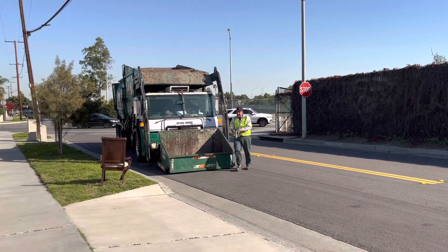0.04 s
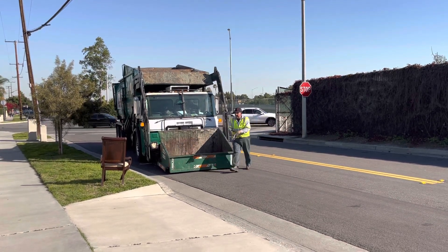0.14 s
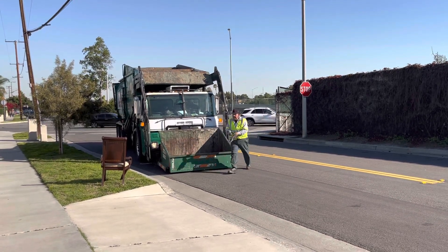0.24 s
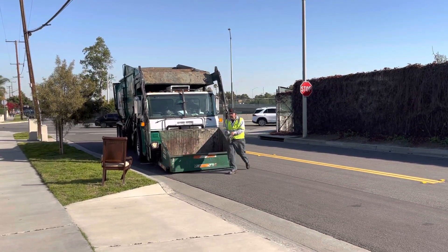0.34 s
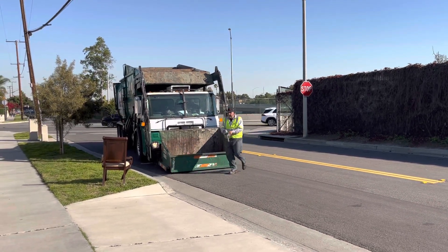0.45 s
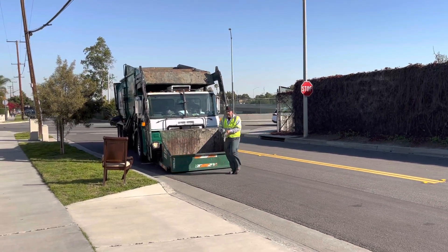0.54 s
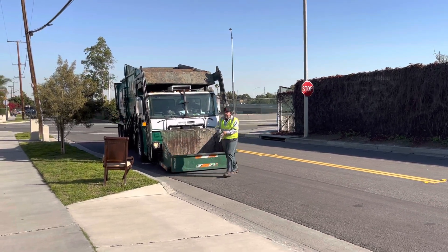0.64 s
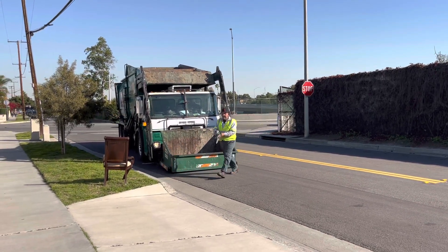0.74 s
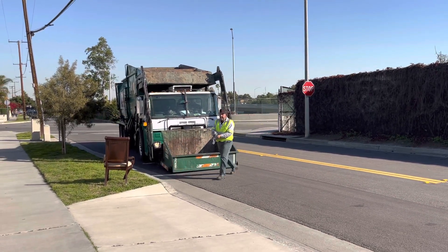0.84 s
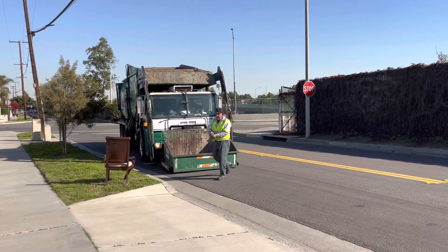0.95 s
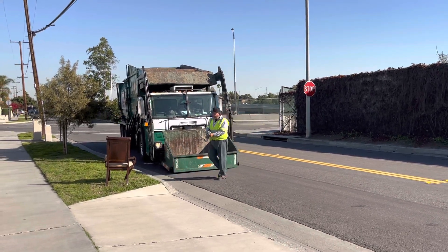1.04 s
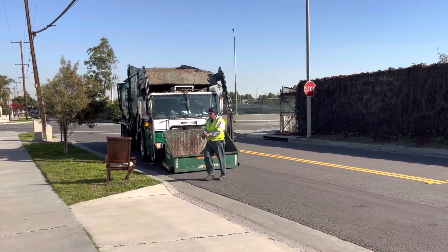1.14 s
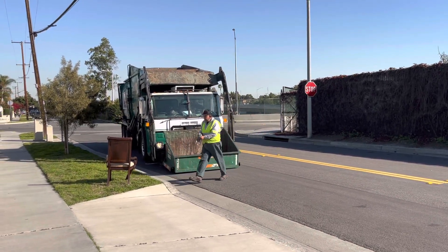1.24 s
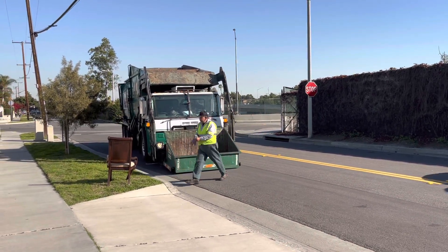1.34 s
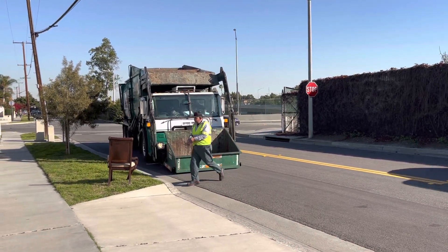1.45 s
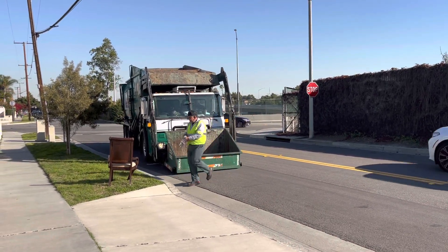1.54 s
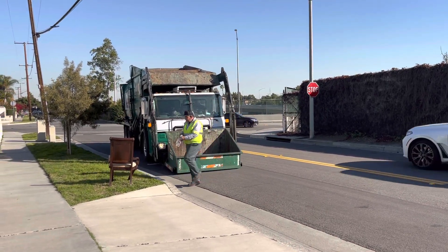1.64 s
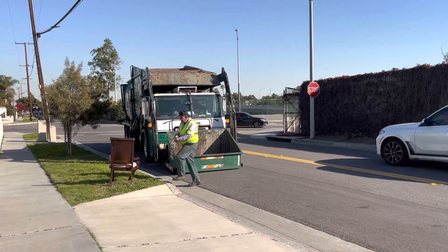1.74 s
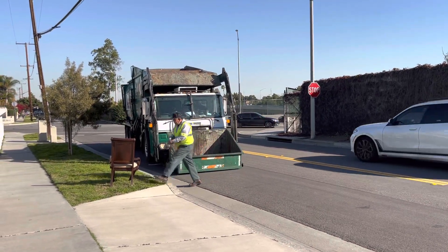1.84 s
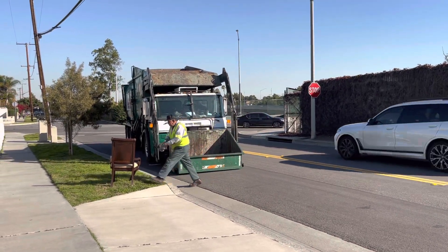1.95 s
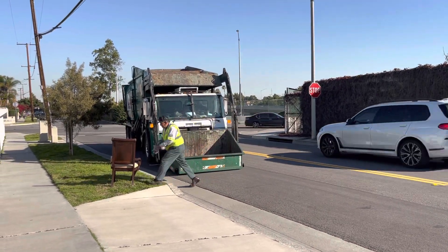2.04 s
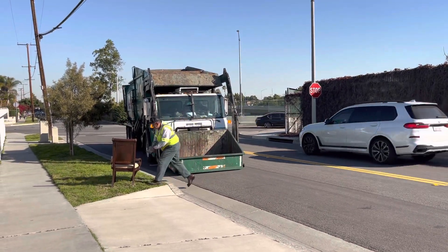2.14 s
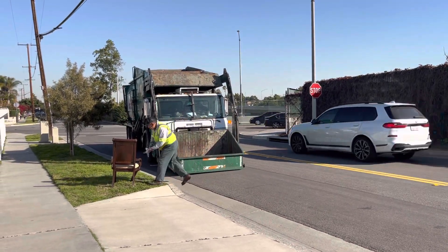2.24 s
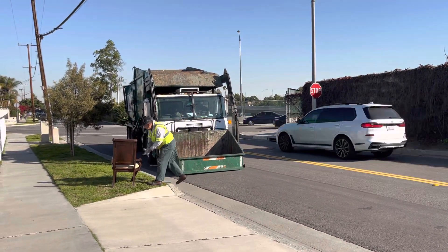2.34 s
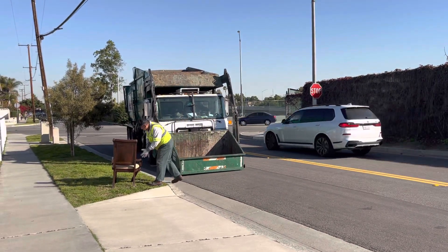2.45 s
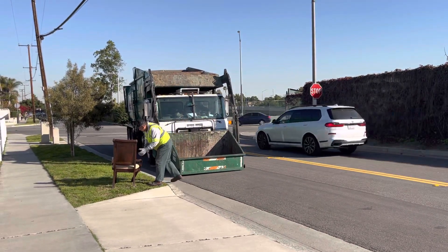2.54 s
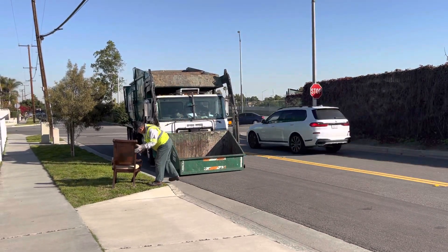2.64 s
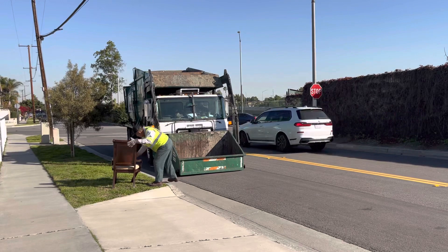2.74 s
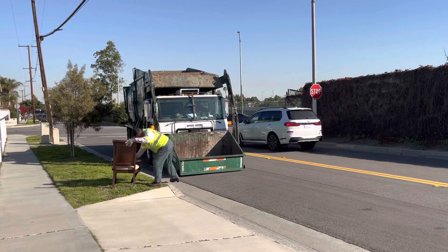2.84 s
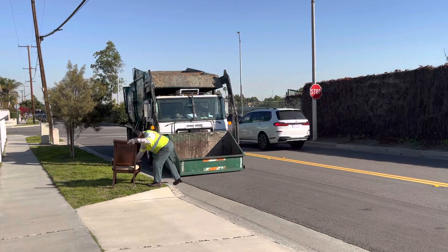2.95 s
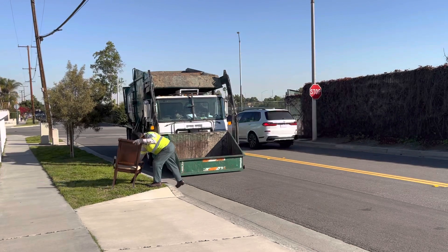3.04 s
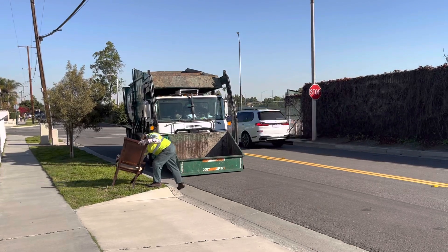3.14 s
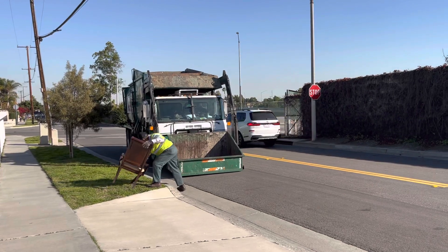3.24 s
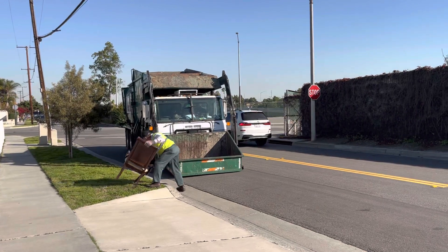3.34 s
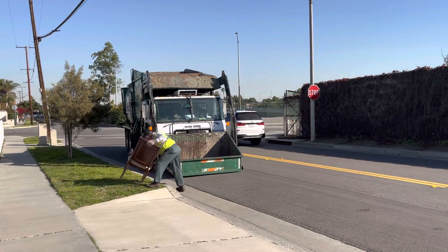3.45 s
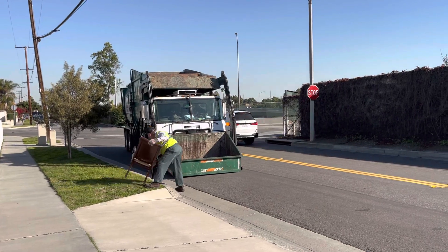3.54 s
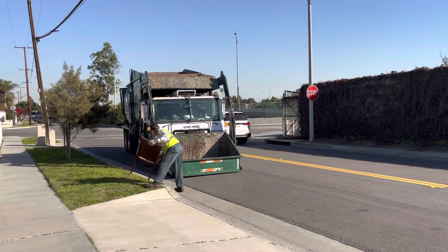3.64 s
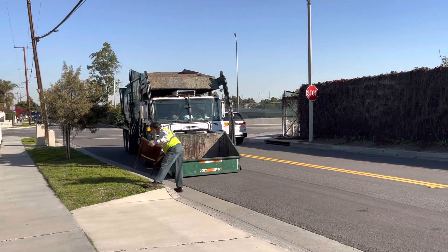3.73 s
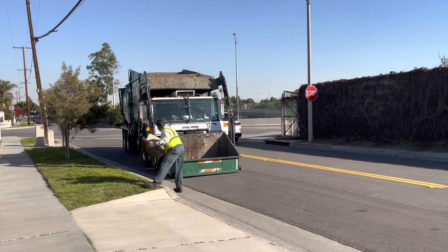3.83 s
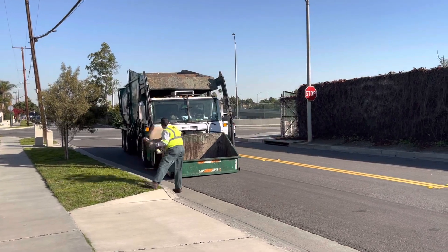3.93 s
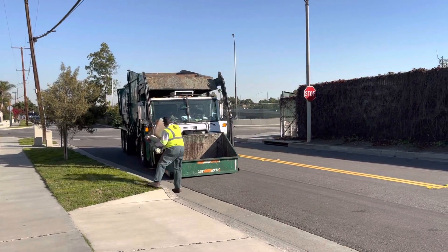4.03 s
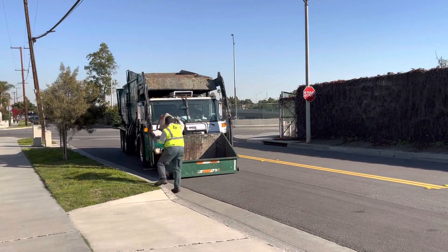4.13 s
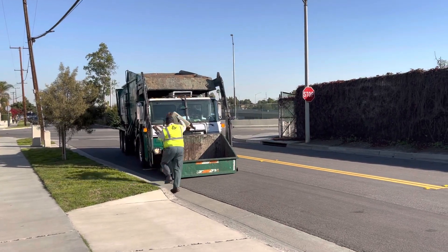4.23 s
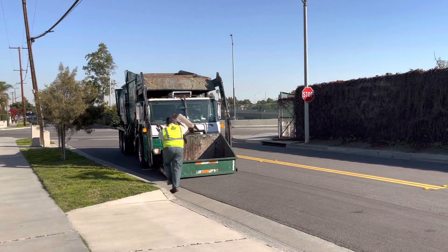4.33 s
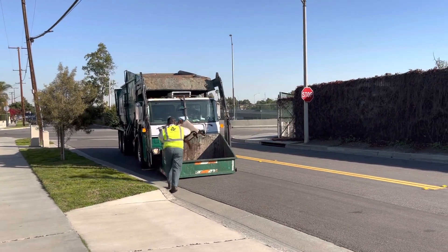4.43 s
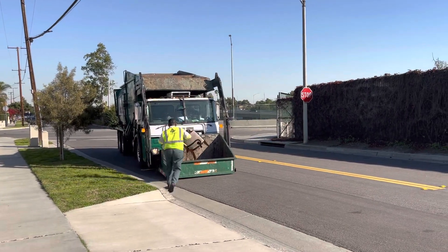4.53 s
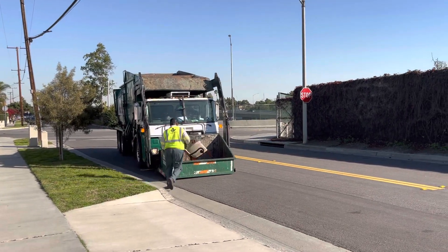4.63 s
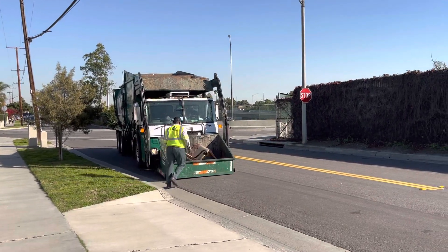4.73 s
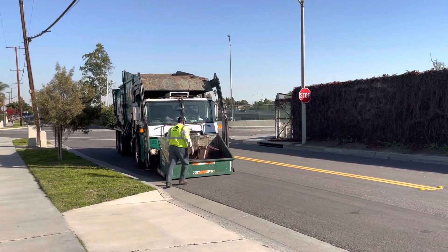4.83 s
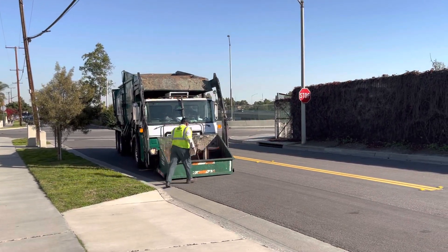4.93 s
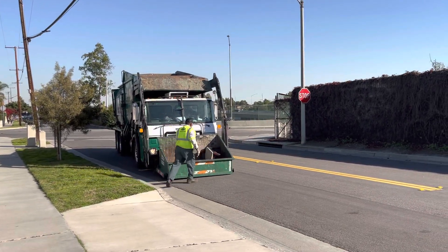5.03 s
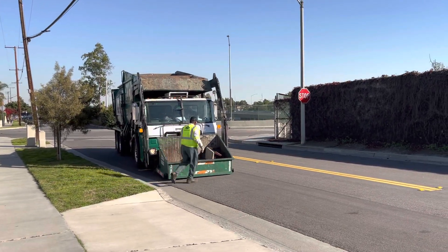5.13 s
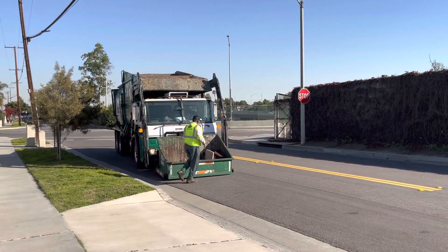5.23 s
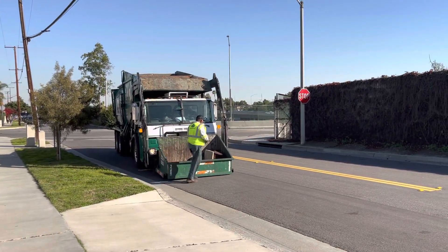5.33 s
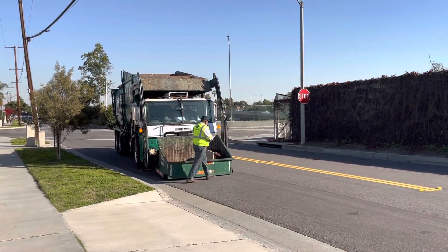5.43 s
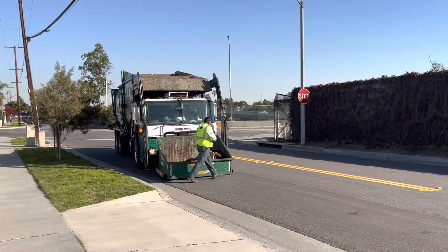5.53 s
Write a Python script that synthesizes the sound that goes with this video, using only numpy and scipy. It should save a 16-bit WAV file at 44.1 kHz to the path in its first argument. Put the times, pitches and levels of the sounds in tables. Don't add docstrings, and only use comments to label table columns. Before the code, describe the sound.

A refuse truck idles with a low throbbing drone on a street, then a wooden chair crashes and booms into its steel bucket.

```python
import sys
import numpy as np
from scipy import signal
from scipy.fft import rfft, irfft
from scipy.io import wavfile
from scipy.ndimage import uniform_filter1d

SR = 44100
rng = np.random.default_rng(int(sys.argv[2]) if len(sys.argv) > 2 else 0)


def level_to_linear(level):
    exponent = np.asarray(level, float) / 20
    return 10 ** exponent


def put_to_file(sound):
    columns = np.atleast_2d(sound).T
    safe = np.clip(columns, -1, 1)
    whole_steps = np.round(safe * 32767)
    wavfile.write(sys.argv[1], SR, whole_steps.astype(np.int16))


N = 246078
T = np.arange(N) / SR

# start in seconds, crack level in dB, boom level in dB, boom centre in Hz.
BLOWS = [(4.7078, -15.5, -7.5, 234), (4.71, -8.5, -9.5, 330), (4.733, -2.5, 0.5, 227),
         (4.769, -20.5, 0, 330), (4.794, -22.5, -1.5, 180), (4.829, -24, -6.5, 197),
         (4.885, -23.5, -7.5, 226), (4.92, -7.5, -5.5, 350), (4.965, -13.5, 0.5, 247),
         (4.994, -12, -8, 120), (5.046, -11.5, -14, 400), (5.053, -1, -6, 450), (5.059, -1, -3.5, 240),
         (5.086, -7.5, -13.5, 330), (5.105, -5, 0.5, 386), (5.119, -14, -1, 146.5), (5.16, -17, 4.5, 117.5),
         (5.196, -24, 2, 204), (5.25, -24.5, -5, 170), (5.285, -44, -6, 130), (5.345, -26, -10.5, 307),
         (5.43, -42, -6, 180), (5.543, -16, -21.5, 480), (5.553, -34, -11, 330)]


def evened(x):
    return x / np.sqrt(np.mean(x ** 2) + 1e-20)


def read(points, hz, column=1):
    columns = np.transpose(points)
    return np.interp(np.log(hz + 1), np.log(columns[0] + 1), columns[column])


def curve(rows):
    seconds, values = np.transpose(rows)
    return np.interp(T, seconds, values)


def drift(rate_hz):
    t = T[::256]
    waves = 0
    for hz in np.geomspace(rate_hz / 8, rate_hz, num=12):
        waves = waves + np.sin(2 * np.pi * (hz * t + rng.random()))
    return np.interp(T, t, evened(waves))


def noise(gain, size):
    frames = 4 * N // size + 5
    real, imag = rng.standard_normal((frames, size // 2 + 1, 2, 2)).T
    hz = np.fft.rfftfreq(size, 1 / SR)[:, None]
    t = np.arange(frames) * size / 4 / SR
    spectra = (real + 1j * imag) * gain(hz, t)
    return signal.istft(spectra, nperseg=size, noverlap=3 * size // 4)[1][:, :N]


def resonate(x, hz, width_hz):
    b, a = signal.iirpeak(hz, hz / width_hz, SR)
    return signal.lfilter(b, a, signal.lfilter(b, a, x))


def exhaust_turns():
    # time in seconds, exhaust tone in Hz (twice the firing rate).
    speed = [(0, 64.05), (2, 63.65), (4.6, 63.1), (5.58, 63.0)]
    return np.cumsum(curve(speed)) / SR


def exhaust_drone(turns):
    # time in seconds, exhaust tone level in dB.
    idle = [(0, -22.5), (.65, -24), (.9, -22), (1.6, -18.5), (2.0, -21.5), (3.1, -24), (3.35, -19.5),
            (3.7, -20), (4.7, -20.5)]
    lope_db, lope_cycles = 1, .01
    swing_db = lope_db * np.cos(2 * np.pi * (turns / 12 - lope_cycles))
    return np.sqrt(2) * level_to_linear(curve(idle) + swing_db) * np.sin(2 * np.pi * turns)


def geared_tones(turns):
    # multiple of the exhaust tone, level in dB, wander in dB.
    geared = [(1.33, -44, 8.5), (1.5, -43, 0.5), (1.77, -49, 7.5), (2.045, -36, 0.5), (3, -42.5, 3),
              (3.61, -35.5, -1), (4.0, -52.5, 7), (4.09, -33.5, 1.8), (4.27, -47, 1), (4.5, -44, 1.5),
              (7.0, -44, 2), (7.35, -52.5, 3)]
    out = 0
    for multiple, db, wander_db in geared:
        slip_turns = 0.1 * drift(rate_hz=3)
        strength = np.sqrt(2) * level_to_linear(db + wander_db * drift(rate_hz=5))
        out = out + strength * np.sin(2 * np.pi * (multiple * turns + slip_turns))
    return out


def knock(turns):
    cylinders = [0, -3, -7, -1, -4, -8]
    # centre in Hz, width in Hz, level in dB.
    block = [(760, 200, -4), (1110, 140, -2), (1300, 200, -7), (1780, 200, -5), (2050, 200, -3),
             (2300, 350, -1), (2550, 220, -6), (3600, 900, -14), (6150, 600, -27)]
    knock_db = -42.5
    firing = turns / 2
    which = firing.astype(int)
    strength_db = np.take(cylinders, which % 6) + 1.5 * rng.standard_normal(400)[which]
    burst = uniform_filter1d(level_to_linear(strength_db - 15 * (firing % 1)), size=250)
    shake = burst * rng.standard_normal((2, N))
    ringing = sum(level_to_linear(db) * evened(resonate(shake, hz, width_hz)) for hz, width_hz, db in block)
    return level_to_linear(knock_db) * evened(ringing)


def roar():
    # frequency in Hz, density in dB per Hz.
    roar_spectrum = [(25, -31.5), (50, 2), (110, -7), (260, -9), (340, -13.5), (800, -17.5), (1000, -21.5),
                     (1300, -21), (1600, -25.5), (2500, -28.5), (2900, -35.5), (4200, -42), (6000, -49),
                     (8000, -50.5), (14500, -62.5)]
    # time in seconds, swell in dB.
    swell = [(0, 2), (1.5, 1), (3, 0.4), (4.7, 0.5)]
    roar_db, patchy_db = -25.5, 1.5

    def wide(hz, t):
        patches = rng.standard_normal((len(t), len(hz))).T
        patches = uniform_filter1d(patches, size=10, axis=0)
        patches = evened(uniform_filter1d(patches, size=8, axis=1))
        return level_to_linear(read(roar_spectrum, hz) + patchy_db * patches)

    return level_to_linear(roar_db + curve(swell)) * evened(noise(wide, size=2048))


def rumble():
    # gust centre in seconds, level in dB.
    street = [(.02, -26), (.5, -21), (1.15, -21), (1.95, -28.5), (2.6, -21), (3.28, -19.5), (3.6, -28),
              (4.05, -28)]
    calm_db, gust_s = -33.5, 0.11
    low = noise(lambda hz, t: level_to_linear(-10 * np.log2((hz + 1) / 80) ** 2), size=2048)
    gusts = level_to_linear(calm_db) + sum(level_to_linear(db) * np.exp(-((T - s) / gust_s) ** 2) for s, db in street)
    return level_to_linear(-6) * gusts * evened(low)


def cracks():
    # frequency in Hz, density in dB per Hz, ring time factor.
    crack_spectrum = [(400, 10.5, 4.7), (816, 4.5, 2.16), (1520, -0.5, 1.05), (2370, -6, 1.6),
                      (4030, -10, 0.76), (7050, -22, 0.81), (9800, -24.5, 0.64), (14600, -41.5, .5)]
    # start in seconds, level in dB, ring in seconds.
    legs = [(4.7112, -15.5, 0.031), (4.7223, -7, 0.13), (4.7265, -10, 0.028), (4.7535, -16, 0.16),
            (4.925, -13, 0.044), (4.9417, -11.5, 0.018), (4.9535, -22, .11), (4.985, -20.5, 0.1),
            (5.1125, -27, .09), (5.543, -26, .055)]
    soft_ring_s, hard_ring_s = 0.53, 0.17
    blow_bright_db, tick_bright_db = -1.1, 6.
    rows = []
    for s, crack_db, _, _ in BLOWS:
        ring_s = np.interp(crack_db, [-24, -4], [soft_ring_s, hard_ring_s])
        rows.append((s, crack_db, ring_s, blow_bright_db))
    rows += [(s, db, ring_s, tick_bright_db) for s, db, ring_s in legs]

    def bursts(hz, t):
        octaves = np.log2(hz / 2500 + 0.14)
        ring_factor = read(crack_spectrum, hz, column=2)
        power = 0
        for s, db, ring_s, bright_db in rows:
            age = np.maximum(t - s, 0)
            burst_db = db + bright_db * octaves - 60 * age / (ring_s * ring_factor)
            power = power + level_to_linear(2 * burst_db) * (t >= s)
        clatter_db = 1.6 * evened(uniform_filter1d(rng.standard_normal(len(t)), size=5))
        return np.sqrt(power) * level_to_linear(clatter_db + read(crack_spectrum, hz) - 15.5) * (hz > 300)

    return noise(bursts, size=128)


def booms():
    # frequency in Hz, level in dB, t60 in seconds.
    panels = [(59.6, 6.5, 0.85), (81, -9, 0.96), (180, -2.5, 0.99), (330, -2.5, 0.87), (520, -7.5, 1),
              (840, -13, 0.18), (1330, -8, 0.28), (2000, -22.5, .15)]
    spread_octaves, rise_s = 1.03, 0.0028
    hz = np.geomspace(62, 2000, num=90)[:, None] * (1 + 0.01184 * rng.standard_normal((90, 1)))
    t = T[:SR * 2 // 5]
    fade = level_to_linear(-60 * t / read(panels, hz, column=2))
    sine = fade * np.sin(2 * np.pi * hz * t)
    cosine = fade * np.cos(2 * np.pi * hz * t)
    edges = (1 - np.exp(-t / rise_s)) * np.cos(np.pi * t / t[-1] / 2)
    out = np.zeros((2, N + SR))
    for s, _, boom_db, centre_hz in BLOWS:
        distance = abs(np.log2(hz / centre_hz) / spread_octaves)
        share = level_to_linear(read(panels, hz) - 7.6 * distance ** 0.74)[:, 0]
        share = share / np.linalg.norm(share)
        phase = 2 * np.pi * rng.random((2, len(hz)))
        modes = (np.cos(phase) * share) @ sine + (np.sin(phase) * share) @ cosine
        out[:, round(s * SR):][:, :len(t)] += level_to_linear(boom_db) * modes * edges
    return out[:, :N]


def rings():
    # start in seconds, frequency in Hz, level in dB.
    ring_notes = [(4.709, 380, -12.5), (4.71, 520, -10), (4.718, 228.2, -5.5), (4.759, 399, -13),
                  (4.782, 330, -20.5), (4.794, 180, -0.5), (4.88, 204, -11), (4.926, 2480, -21.5),
                  (4.927, 1330, -13), (4.955, 246.4, -6), (4.986, 77.6, -11.5), (5.06, 158.5, -2),
                  (5.11, 182, -4), (5.076, 330, -5.5), (5.057, 864, -17), (5.08, 406, -15),
                  (5.132, 77.7, -9.5), (4.999, 412, -13.5), (5.187, 201.7, -10), (5.2, 520, -11),
                  (5.267, 113.5, -8), (5.329, 313.6, -9.5), (5.42, 193, -21.5), (5.549, 311, -9.5)]
    rise_s, t60_at_200_hz_s, t60_slope = 0.0013, 0.51, 0.51
    out = np.zeros(N)
    for s, hz, db in ring_notes:
        age = np.maximum(T - s, 0)
        t60_s = t60_at_200_hz_s * (200 / hz) ** t60_slope
        swell_and_fade = level_to_linear(db - 60 * age / t60_s) * (1 - np.exp(-age / rise_s))
        out += np.sqrt(2) * swell_and_fade * np.sin(2 * np.pi * (hz * age + rng.random()))
    return out


def scene():
    turns = exhaust_turns()
    notes = exhaust_drone(turns) + geared_tones(turns) + rings()
    return [[1], [0]] * notes + knock(turns) + roar() + rumble() + cracks() + booms()


def band_limit(x):
    return signal.sosfilt(signal.butter(12, 14530, fs=SR, output="sos"), x)


def record(dry):
    # frequency in Hz, likeness 0-1, right leads in radians, left minus right in dB.
    port_pair = [(60, .985, -.05, 1), (230, .93, -.2, 1), (520, .55, -.5, 1.3), (950, .12, 0, 1),
                 (1500, .4, 2.4, -3.5), (1800, .8, 0, 3), (2400, .87, -.5, -2), (3300, .4, -2.6, 3.5),
                 (3900, .25, -1.4, 6.3), (4900, .25, -.8, 3.7), (6200, .65, .8, 3), (7800, .995, 2.85, 0),
                 (9000, .995, 3.45, 0), (11900, .97, 6.28, 0), (14800, .9, 9.42, 0)]
    first, second = rfft(dry, 2 ** 18)
    hz = np.fft.rfftfreq(2 ** 18, 1 / SR)
    columns = np.transpose(port_pair)
    alike, lead_rad, lean_db = (np.interp(hz, columns[0], c) for c in columns[1:])
    alike = np.clip(alike, 0, 1)
    right = alike * np.exp(1j * lead_rad) * first + np.sqrt(1 - alike ** 2) * second
    ports = irfft(np.array([first * level_to_linear(lean_db / 2), right / level_to_linear(lean_db / 2)]))[:, :N]
    ports = signal.sosfilt(signal.butter(3, 42, "high", fs=SR, output="sos"), ports)

    power = uniform_filter1d((ports ** 2).mean(0), size=600, origin=250)
    power_db = 10 * np.log10(abs(power) + 1e-12)
    fall_db = T * 21.8
    held_db = np.maximum.accumulate(power_db + fall_db) - fall_db
    over_db = np.maximum(held_db + 14.5, 0)
    late_db = signal.lfilter([1 / 400], [1, 1 / 400 - 1], over_db)
    ducked = ports / level_to_linear(.56 * late_db)
    return band_limit(1.066 * np.tanh(ducked / 1.19))


dry = scene()
out = record(dry)
put_to_file(out)
```